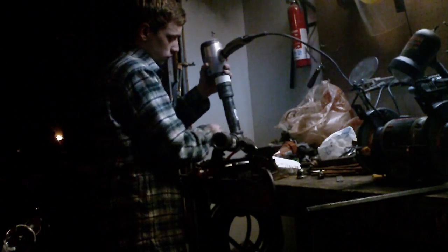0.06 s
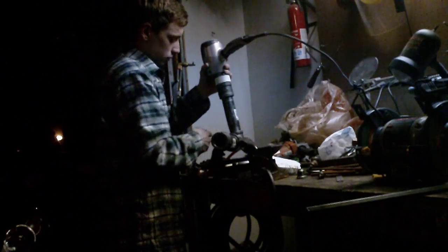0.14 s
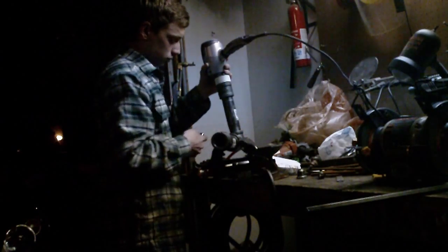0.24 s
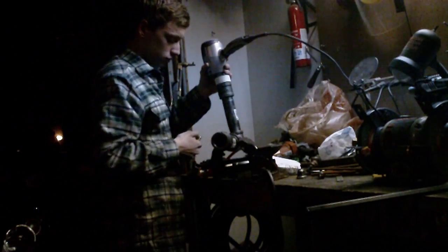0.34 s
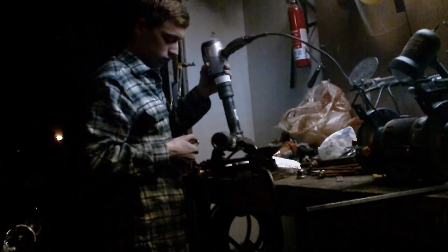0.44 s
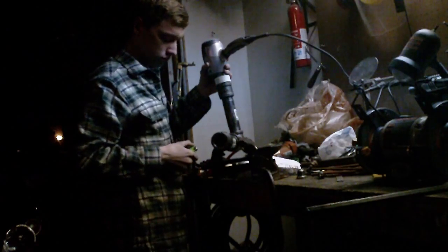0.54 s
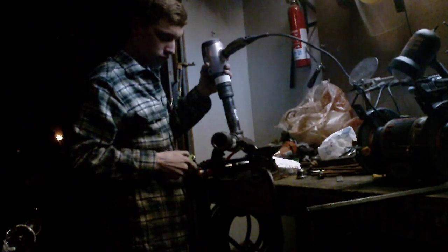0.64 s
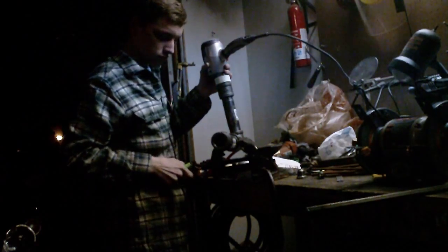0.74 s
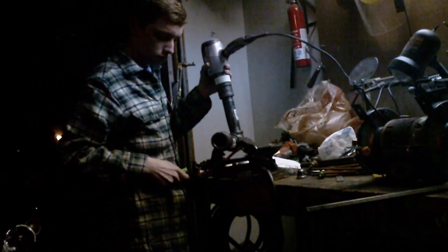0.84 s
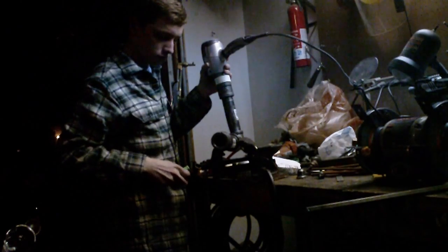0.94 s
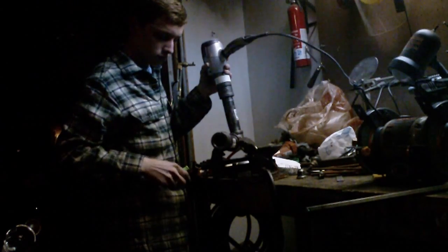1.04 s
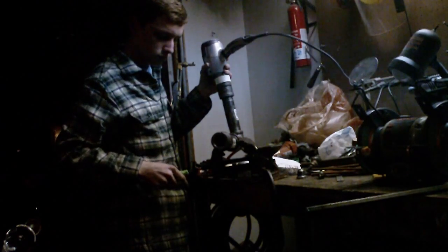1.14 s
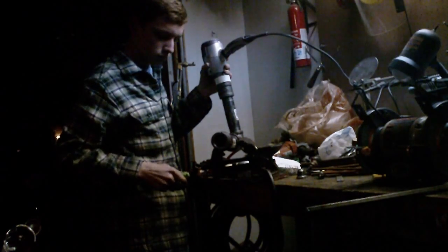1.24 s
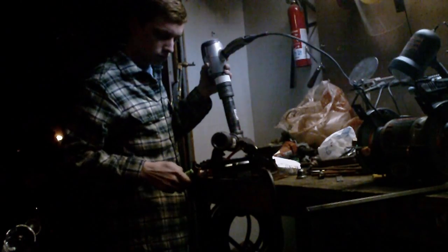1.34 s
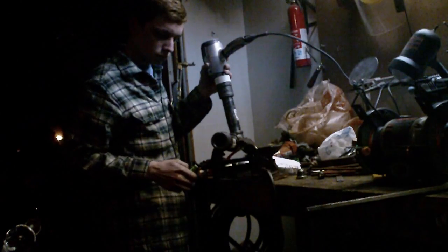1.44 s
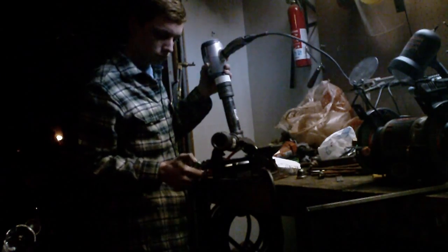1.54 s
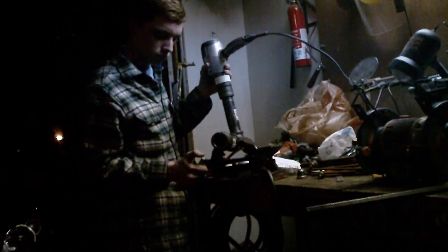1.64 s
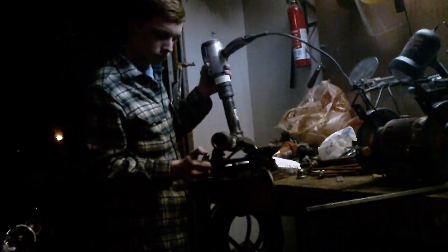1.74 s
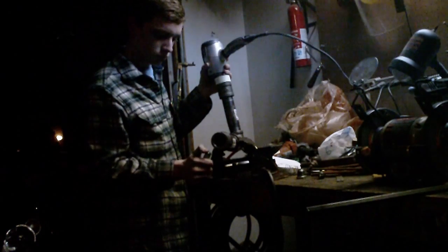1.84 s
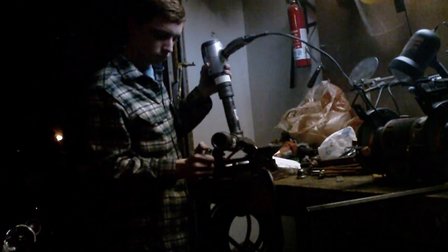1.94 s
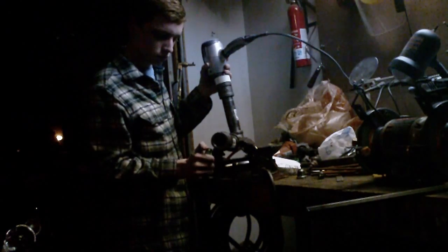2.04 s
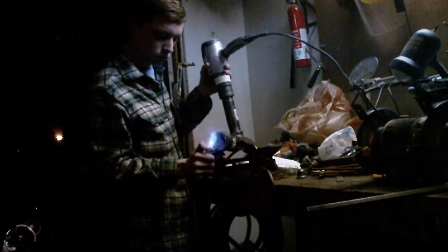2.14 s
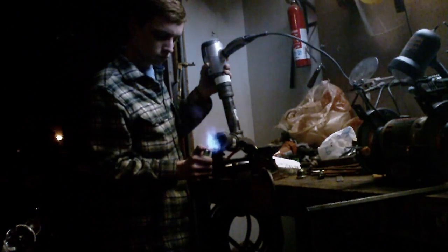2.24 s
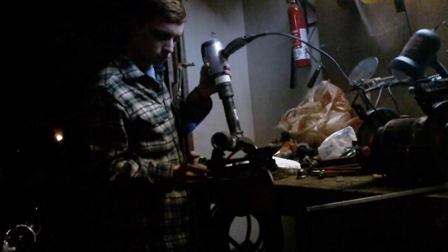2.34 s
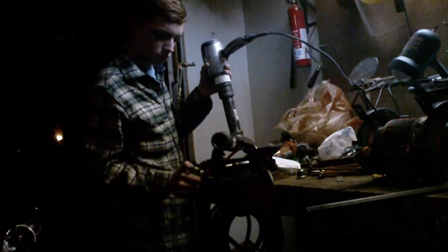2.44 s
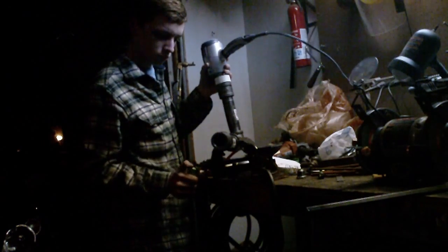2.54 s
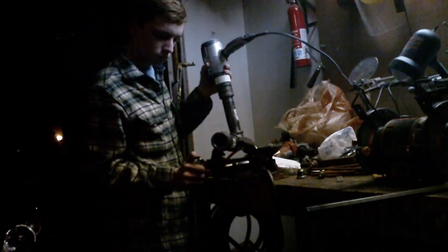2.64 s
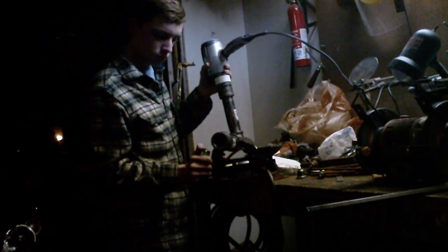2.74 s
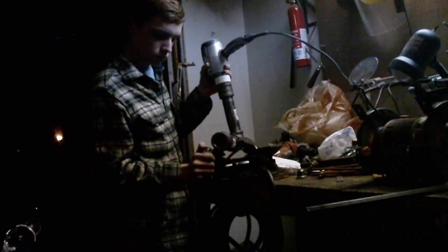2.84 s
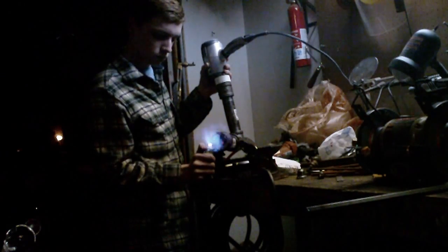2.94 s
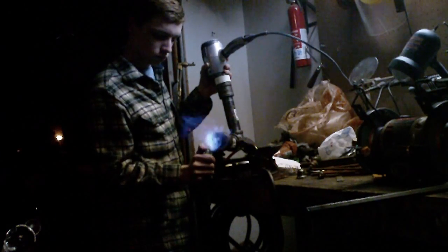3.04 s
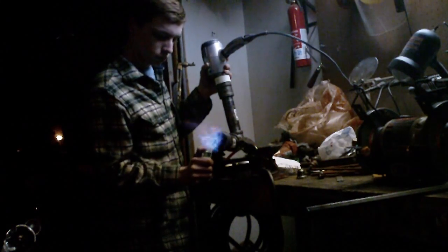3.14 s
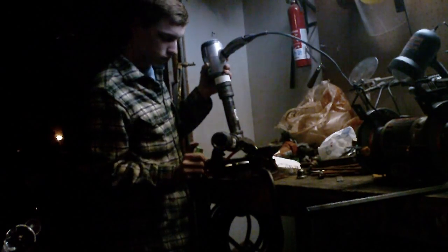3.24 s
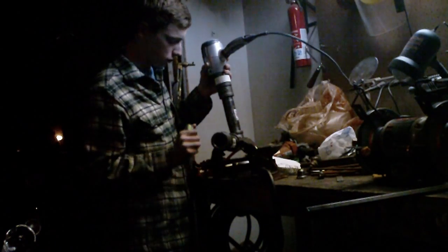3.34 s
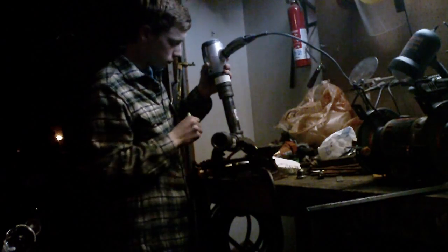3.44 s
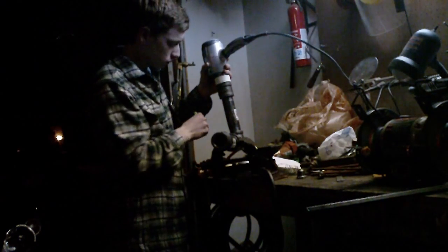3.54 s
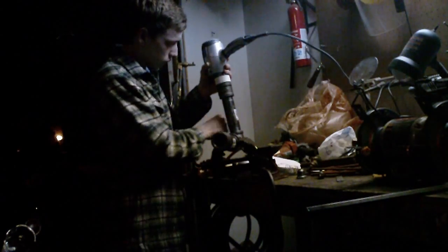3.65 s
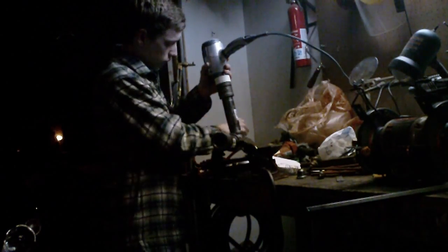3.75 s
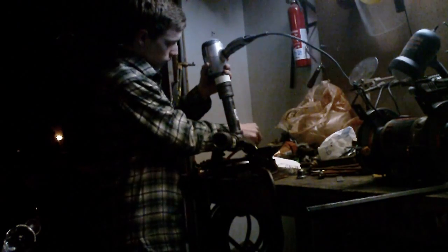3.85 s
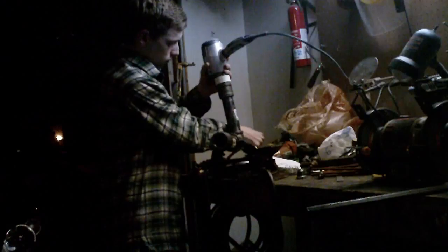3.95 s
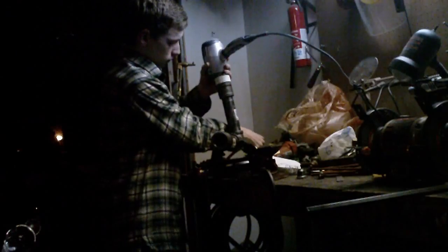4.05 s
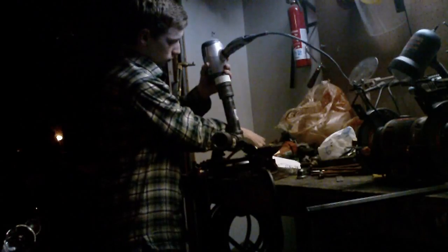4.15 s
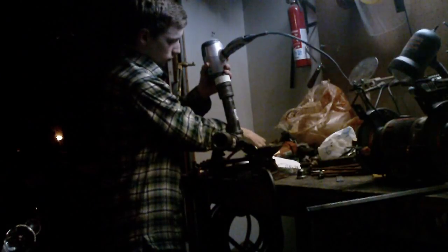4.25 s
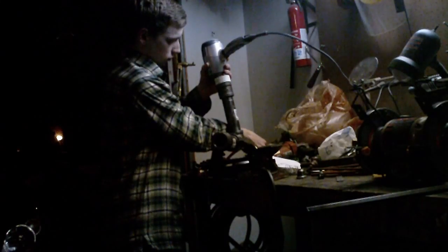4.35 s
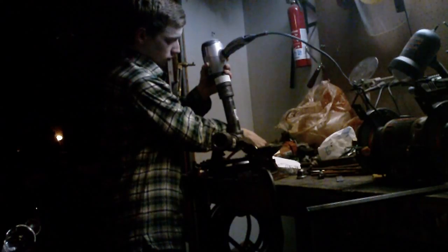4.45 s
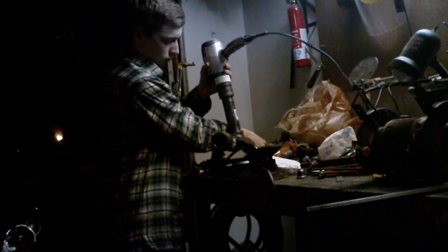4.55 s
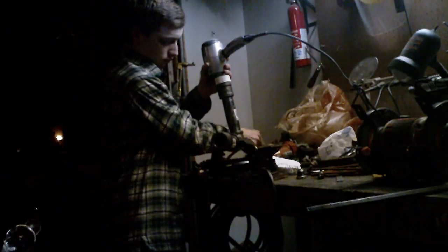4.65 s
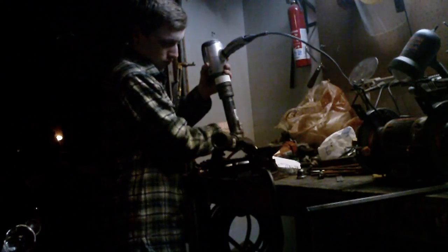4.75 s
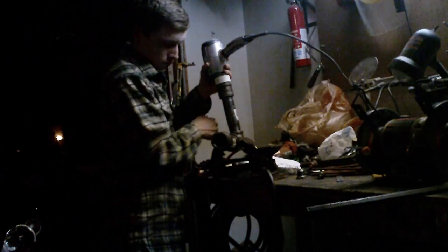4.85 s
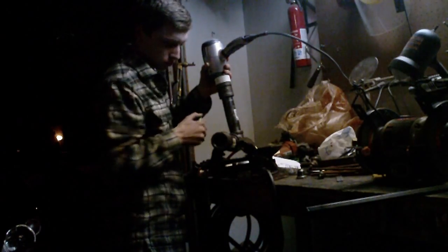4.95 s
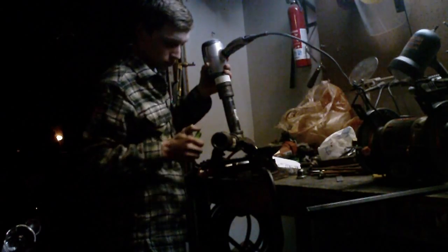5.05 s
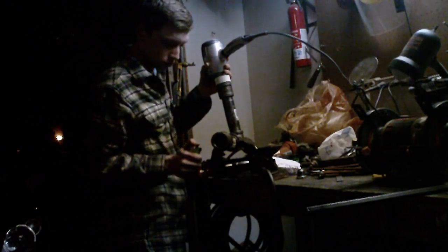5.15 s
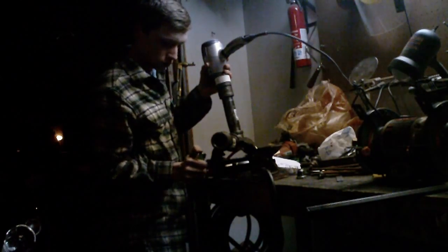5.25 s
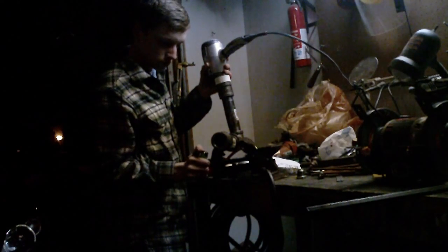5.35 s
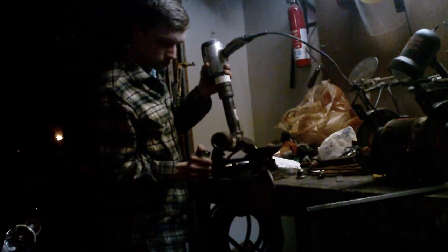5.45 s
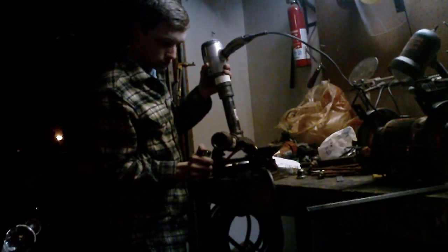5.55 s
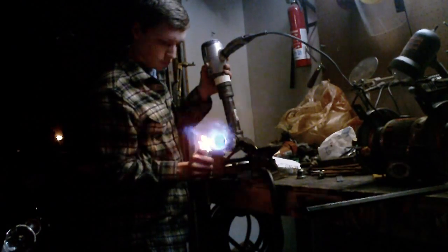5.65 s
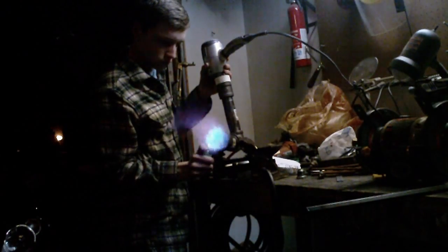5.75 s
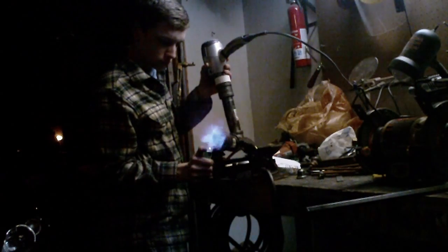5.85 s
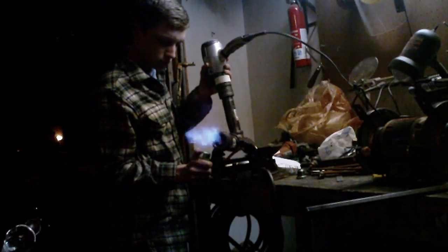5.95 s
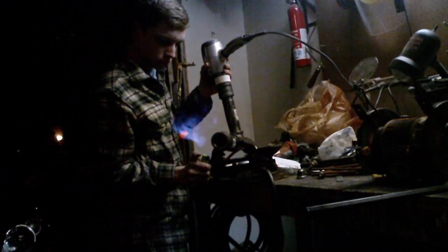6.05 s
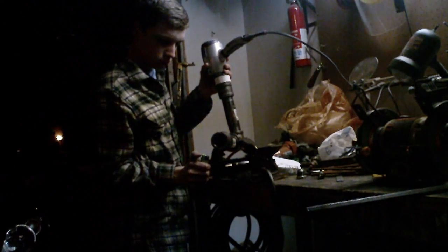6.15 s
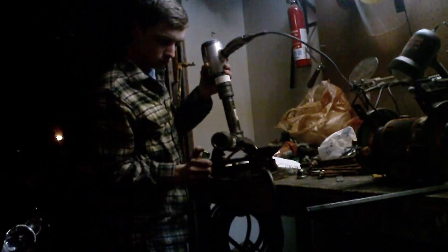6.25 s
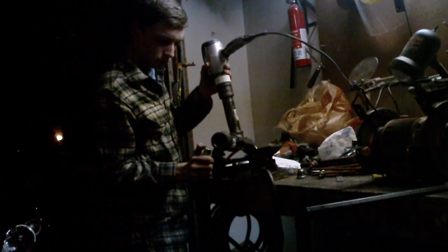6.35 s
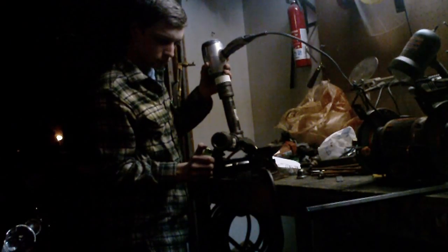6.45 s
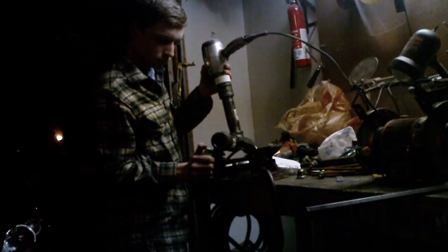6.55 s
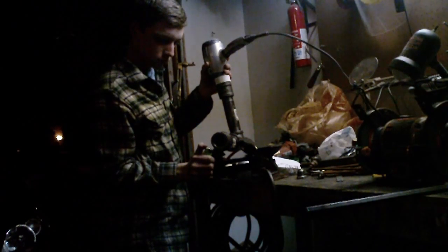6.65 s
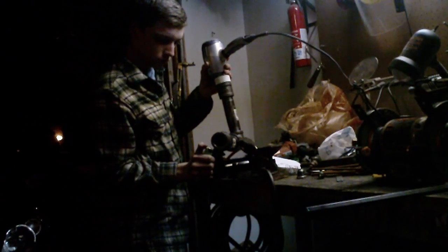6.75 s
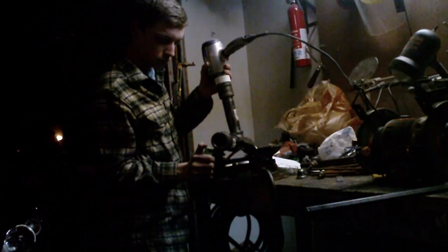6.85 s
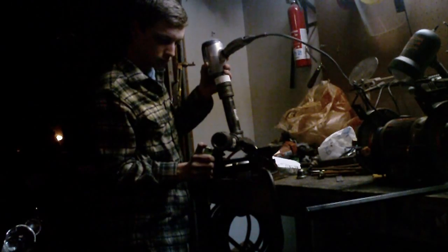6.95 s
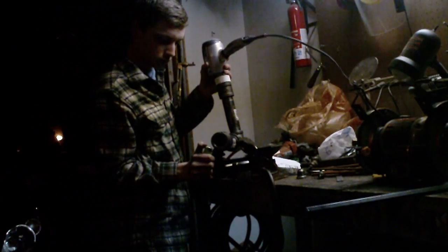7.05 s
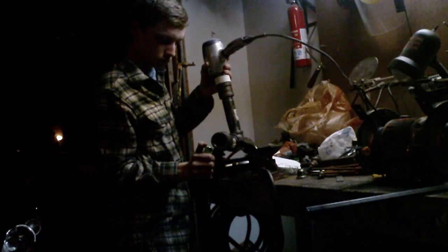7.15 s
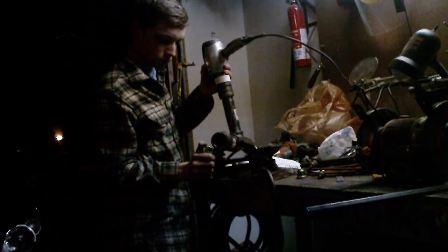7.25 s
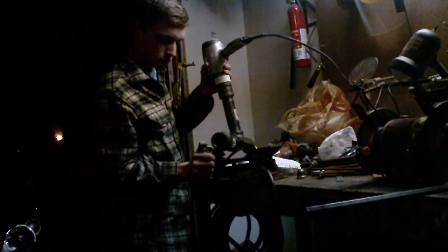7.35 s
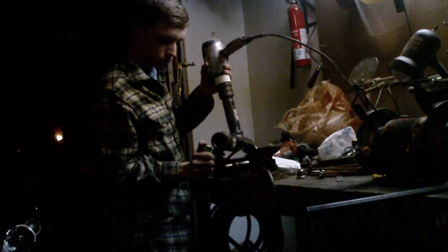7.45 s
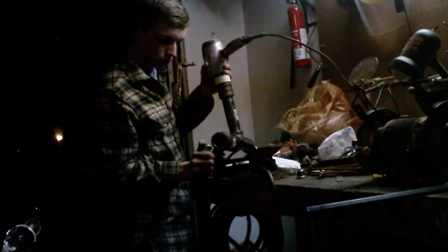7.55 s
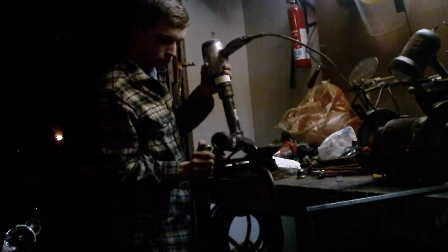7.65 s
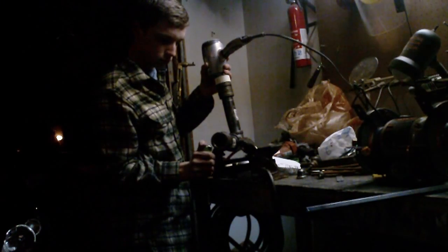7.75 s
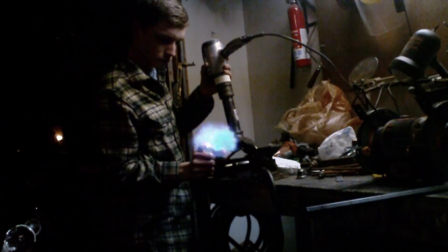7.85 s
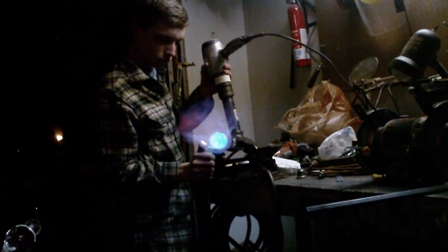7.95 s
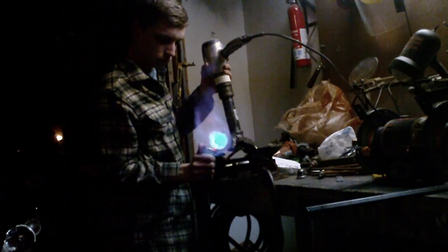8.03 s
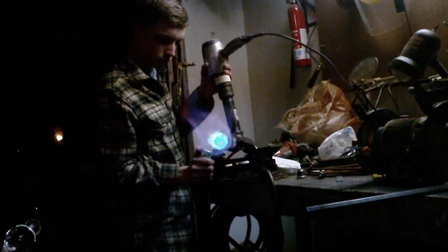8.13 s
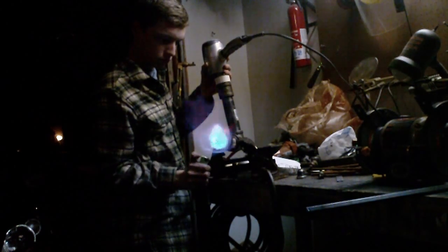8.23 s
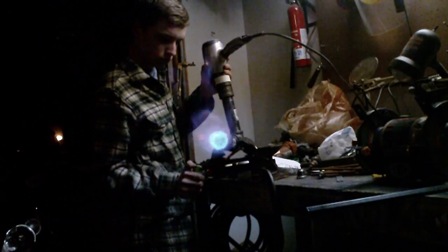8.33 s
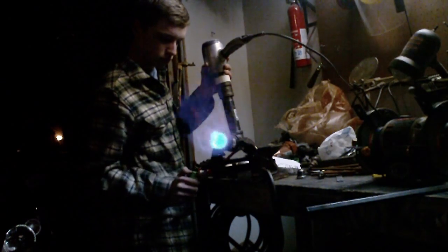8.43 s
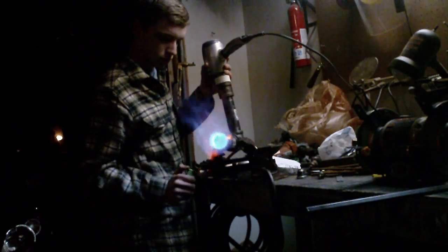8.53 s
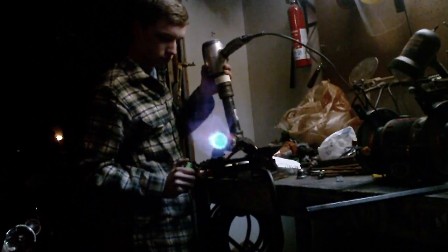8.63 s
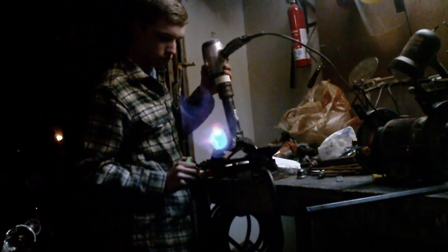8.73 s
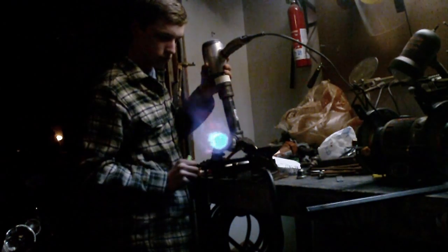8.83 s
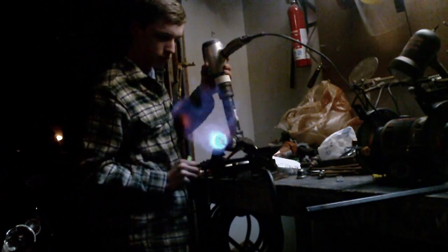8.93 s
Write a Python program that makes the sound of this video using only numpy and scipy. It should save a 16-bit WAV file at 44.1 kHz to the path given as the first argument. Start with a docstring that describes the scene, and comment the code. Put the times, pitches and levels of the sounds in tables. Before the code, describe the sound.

Over a steady blower and gas hiss, three igniter clicks bring short puffs of flame before a fourth lights a lasting roar.

```python
"""Lighting a blown propane burner.

In a garage, a hair dryer blows steadily down a steel pipe into a burner, where the unlit mixture hisses.
An igniter snaps four times: three times the gas catches and blows out, the fourth time it holds and roars.
The hiss softens while the flame burns, and every snap ducks the camera's gain control."""
import sys
import numpy as np
from scipy import signal
from scipy.fft import rfft, irfft, next_fast_len
from scipy.io import wavfile
from scipy.ndimage import uniform_filter1d, map_coordinates

SR = 44100
rng = np.random.default_rng(int(sys.argv[2]) if len(sys.argv) > 2 else 0)


def bounce(signal):
    """Save signal as a 16-bit WAV file at the path given by the first command-line argument."""
    frames = np.transpose(np.atleast_2d(signal))
    limited = np.clip(frames, -1, 1)
    pcm = np.round(limited * 32767).astype(np.int16)
    wavfile.write(sys.argv[1], SR, pcm)


N = 396459


def amp(db):
    """Decibels to gain."""
    return 10 ** (np.asarray(db) / 20)


def unit(x):
    """x at rms 1."""
    return x / np.sqrt(np.mean(x ** 2) + 1e-20)


def ramp(x):
    """0 before x = 0, 1 after x = 1, straight between."""
    return np.clip(x, 0, 1)


def along(points, hz):
    """(frequency, value) points read on a log axis."""
    freqs, values = np.transpose(points)
    return np.interp(np.log(hz + 1), np.log(freqs + 1), values)


def wobble(rate):
    """A smooth random curve, rate knots a second."""
    knots = rng.standard_normal(int(N * rate / SR) + 4)
    return map_coordinates(knots, [np.arange(N) * rate / SR])


def filtered(x, response):
    """x through an EQ curve, given as gain against frequency."""
    size = next_fast_len(len(x) + SR // 4)
    return irfft(rfft(x, size) * response(np.fft.rfftfreq(size, 1 / SR)), size)[:len(x)]


def add(track, start_s, sound):
    """Mixes a sound into the track at a time."""
    part = track[round(start_s * SR):][:len(sound)]
    part += sound[:len(part)]


def turbulence(spectrum, modes):
    """Broad flow noise plus the resonances that it keeps ringing."""
    def gain(hz):
        power = amp(along(spectrum, hz)) ** 2
        for centre, width, db in modes:
            power += (amp(db) / (1 + 1.66 * ((hz - centre) / width) ** 2)) ** 2
        return np.sqrt(power * SR / 2)
    return filtered(rng.standard_normal(N), gain)


# The garage's short reverb: (frequency [Hz], decay T60 [s])
GARAGE_DECAY = [(200, 0.15), (2500, 0.31), (12000, 0.076)]


def garage(x, wet_db):
    """Direct sound plus the wash off the walls, at unchanged power."""
    hz, t, noise = signal.stft(rng.standard_normal(SR // 2), SR, nperseg=256)
    decay = amp(-60 * t / along(GARAGE_DECAY, hz)[:, None])
    tail = signal.istft(noise * decay, SR, nperseg=256)[1]
    reverb = signal.fftconvolve(x, tail / np.linalg.norm(tail))[:len(x)]
    return (x + amp(wet_db) * reverb) / np.hypot(1, amp(wet_db))


# The dryer's bed of rushing air: (frequency [Hz], level [dB per Hz])
AIR_RUSH = [(25.0, -93.3), (60.0, -80.5), (130.0, -78), (240.0, -71.5), (430.0, -67.5), (470.0, -55.5),
            (900.0, -63), (1150.0, -60.5), (1400.0, -62.5), (1700.0, -59.5), (3000.0, -63.5), (6000.0, -67),
            (9000.0, -74.5), (15000.0, -83)]
# Hollow ring of the dryer's barrel and the pipe: (frequency [Hz], width [Hz], level [dB per Hz])
PIPE_MODES = [(255.3, 9.1, -60.5), (279, 13, -62), (398, 32, -68), (468, 4.8, -57), (531, 24.4, -48),
              (572, 23, -60), (673.5, 36, -50.5), (719.4, 16.7, -45.5), (786.3, 7.3, -40.5),
              (825.6, 23.6, -47.5), (882, 20, -52), (926, 36, -53.5), (1037, 26, -55.5), (1520, 9.3, -53),
              (2120, 14, -53), (2360, 175, -59), (2736, 186, -60), (4803, 38, -48.5)]
# Whine of motor and fan: (frequency [Hz], level [dB rms])
MOTOR_TONES = [(781, -34), (1253, -37.5)]


def dryer(drift=0.00099, waver_db=1.6):
    """The fan's air rings the pipe; motor and blades add a slightly unsteady whine."""
    air = amp(0.26 * wobble(3.13)) * turbulence(AIR_RUSH, PIPE_MODES)
    motor_time = np.cumsum(1 + drift * wobble(4)) / SR
    whine = sum(amp(db + waver_db * wobble(9)) * unit(np.sin(2 * np.pi * hz * motor_time))
                for hz, db in MOTOR_TONES)
    return air + whine


# Hiss of the jet at the burner's mouth: (frequency [Hz], level [dB per Hz])
JET_HISS = [(1500, -100), (3000, -83), (4500, -64), (6500, -60), (7500, -68), (9300, -72.5), (11000, -89),
            (13000, -72), (15000, -72)]
# Whistling resonances of the burner tube: (frequency [Hz], width [Hz], level [dB per Hz])
BURNER_MODES = [(3454, 420, -60), (3956, 83, -55.5), (4284, 24, -53), (4780, 49, -50.5), (5230, 21, -52),
                (5280, 37, -48.5), (5680, 61, -54.5), (5880, 39, -51.5), (6010, 41, -49.5), (6098, 28, -49),
                (6300, 57, -60), (6640, 60, -54.5), (6860, 77, -57.5), (7276, 220, -52.5),
                (7680, 87, -57.5), (7903, 125, -49.5), (8310, 64, -52), (8800, 160, -62), (9752, 145, -65),
                (10270, 120, -65.5), (10716, 98, -67.5), (12140, 910, -63), (12500, 35, -54.5),
                (12809, 102, -60), (13266, 289, -57.5), (13721, 203, -59), (14241, 92, -63),
                (15153, 96, -60.5)]
# The hiss darkens as the valve is turned: (time [s], lean from 8 kHz towards 5 kHz [relative])
VALVE_LEAN = [(.8, 1), (2.1, -0.3), (4.25, -1), (4.65, 2.5), (5.7, 2.5), (6.4, 0.5)]


def jet(flutter_db=0.42, fade_db_per_s=.1, brighten_db_per_s=0.25, top_surge_db=5.5):
    """The mixture hisses out, slowly growing thinner and brighter; a flame softens the top band most."""
    hiss = garage(turbulence(JET_HISS, BURNER_MODES), wet_db=-10.5)
    # three bands, near 5, 8 and 13 kHz
    low = filtered(hiss, lambda hz: along([(6500, 0.98), (7400, 0.044)], hz))
    top = filtered(hiss, lambda hz: along([(8500, 0.04), (12000, 1)], hz))
    mid = hiss - low - top
    t = np.arange(N) / SR
    lean = np.interp(t, *np.transpose(VALVE_LEAN))
    grip, surge = flame_on_jet()
    surge_db = top_surge_db * surge
    low *= amp(0.68 - fade_db_per_s * t + 0.63 * lean + 0.95 * surge_db - 4.5 * grip)
    mid *= amp(0.4 - fade_db_per_s * t - 0.77 * lean + 1.9 * surge_db - 8.5 * grip)
    top *= amp(-1.3 + brighten_db_per_s * t + surge_db - 10.3 * grip)
    return amp(flutter_db * wobble(12)) * (low + mid + top)


# Bright, tight ring of the igniter's body: (frequency [Hz], relative level [dB], decay T60 [s])
IGNITER_MODES = [(2130, -9, 0.01), (2560, -6, 0.0076), (3800, -13, 0.0049), (4470, -6, 0.0096),
                 (4920, -1.5, 0.0081), (5500, -2, 0.0069), (7900, -3.5, 0.0039), (13200, -12, .005)]


def hammer_blow(t, crack_db=-8, crack_t60=0.0055):
    """One blow of the igniter's hammer: the body's modes under a brief crack."""
    ring = sum(amp(db + rng.normal(0, 1) - 60 * t / t60) * np.sin(2 * np.pi * (hz * t + rng.random()))
               for hz, db, t60 in IGNITER_MODES)
    crack = amp(crack_db - 60 * t / crack_t60) * rng.standard_normal(len(t))
    return ring + crack


# Cue list of the four tries, for snap, whump and flame: (time [s], snap level [dB], wait to catch [s],
# whump level [dB], flame gain [dB], first flare over that gain [dB], burn time [s])
TRIES = [(2.1698, -5, 0.038, -26, -4, -5.5, 0.19), (2.9999, -5, 0.043, -28.5, -4.5, 0, 0.21),
         (5.7126, -6, 0.047, -21, -1.7, 8.5, .32), (7.9352, -4.5, .035, -4.5, 0, 4, 1.2)]


def igniter(rebound_s=.0034, rebound_db=-2, low_cut_hz=1300):
    """The spring hammer strikes and rebounds: a hard double snap in the room."""
    track, t = np.zeros(N), np.arange(SR // 3) / SR
    for start, db, *_ in TRIES:
        snap = hammer_blow(t)
        add(snap, rebound_s, amp(rebound_db) * hammer_blow(t))
        # so small a body radiates no bass
        snap = filtered(snap, lambda hz: (hz / low_cut_hz) ** 2 / np.hypot(1, (hz / low_cut_hz) ** 2))
        snap = garage(snap, wet_db=-0.5)
        attack_rms = np.std(snap[:SR // 160])
        add(track, start, amp(db) * snap / attack_rms)
    return track


def whumps(pitch_hz=245, swell_s=0.0043):
    """The gathered gas catches a moment after the spark, with a few low pressure swings."""
    track, t = np.zeros(N), np.arange(SR // 8) / SR
    push = (t / swell_s) ** 2 * np.exp(2 * (1 - t / swell_s))
    for start, _, wait, db, *_ in TRIES:
        add(track, start + wait, amp(db) * push * np.sin(2 * np.pi * pitch_hz * t))
    return track


def flame_on_jet(lead_s=.025, grip_s=.035, size_power=1.76, return_lag_s=0.13, return_s=0.096,
                 surge_s=.5, brief_below_s=0.32):
    """How firmly a flame grips the jet (a bigger one more so), and the hiss's surge after a brief one."""
    t, grip, surge = np.arange(N) / SR, np.zeros(N), np.zeros(N)
    for start, _, wait, _, flame_db, _, burn_s in TRIES:
        age = t - start - wait
        since_out = age - burn_s - return_lag_s
        caught = ramp((age + lead_s) / grip_s)
        gone = ramp(since_out / return_s + .5)
        grip += amp(size_power * flame_db) * caught * (1 - gone)
        brevity = ramp(1 - burn_s / brief_below_s)
        overshoot = brevity * gone * np.exp(-np.maximum(since_out, 0) / surge_s)
        surge = surge * (1 - caught) + overshoot
    return grip, surge


def flame_envelope(spread_db_per_s=1200, flare_s=0.033, blowout_db_per_s=132):
    """Flame gain in dB: it spreads, flares and holds; once its burn time is up the air blows it out."""
    t, envelope_db = np.arange(N) / SR, np.full(N, -80.0)
    for start, _, wait, _, flame_db, flare_db, burn_s in TRIES:
        age = t - start - wait
        spreading = spread_db_per_s * np.minimum(age, 0)
        flare = flare_db * np.exp(-np.maximum(age, 0) / flare_s)
        failing = blowout_db_per_s * np.maximum(age - burn_s, 0)
        envelope_db = np.maximum(envelope_db, flame_db + spreading + flare - failing)
    return envelope_db


# Broad roar of turbulent combustion: (frequency [Hz], level [dB per Hz])
COMBUSTION = [(25, -68), (60, -56.5), (150, -55.5), (400, -57), (800, -61), (1000, -54), (1300, -55),
              (1700, -66.5), (2500, -68), (6000, -88)]
# Boom of burner and garage under the roar: (frequency [Hz], width [Hz], level [dB per Hz])
ROAR_MODES = [(104, 19, -53), (175, 21.4, -39.5), (213, 14, -41), (247.7, 19.6, -37), (305.4, 23, -38),
              (352, 20, -44), (477, 25, -43), (552, 100, -48.5), (752, 33, -45)]


def flame(flicker_db=1.0, rasp_db=-1.5, rasp_growth=0.22, seated_at_s=8.3, seating_s=0.14):
    """A flickering roar: a bigger flame rasps more; seated in the burner, it trades rumble for rasp."""
    burn_db = flame_envelope()
    roar = turbulence(COMBUSTION, ROAR_MODES)
    rumble = filtered(roar, lambda hz: along([(90, 1), (150, 0)], hz))
    rasp = filtered(roar, lambda hz: along([(360, 0.044), (460, 0.47)], hz))
    body = roar - rumble - rasp
    seated = (1 + np.tanh((np.arange(N) / SR - seated_at_s) / seating_s)) / 2
    rumble *= amp(-5 * seated)
    rasp *= amp(rasp_db + rasp_growth * burn_db + 4.5 * seated)
    return amp(burn_db + flicker_db * wobble(45)) * (rumble + body + rasp)


def scene():
    """Everything at the workbench, mixed to mono."""
    return (dryer() + jet() + flame() + igniter() + whumps())[None]


def gain_control(x, threshold_db=-11, slope=0.85, release_db_per_s=6, attack_s=0.0087):
    """Sharp treble peaks duck the whole mix quickly, and the gain creeps back."""
    treble = filtered(x, lambda hz: hz > 1500)
    level_db = 10 * np.log10(np.abs(uniform_filter1d(treble ** 2, size=SR // 160)) + 1e-12)
    wanted_cut_db = slope * np.maximum(level_db - threshold_db, 0)
    creep_db = release_db_per_s * np.arange(N) / SR
    held_cut_db = np.maximum.accumulate(wanted_cut_db + creep_db) - creep_db
    step = 1 - np.exp(-2 / (attack_s * SR))
    return x * amp(-signal.lfilter([step], [1, step - 1], held_cut_db))


def record(dry, notch_hz=11230, notch_width_hz=550, high_cut_hz=15330):
    """The camera's signal chain: a narrow treble notch, gain control, clipping and a high cut."""
    x = filtered(dry[0], lambda hz: np.abs(hz - notch_hz) / np.hypot(hz - notch_hz, notch_width_hz))
    x = np.clip(gain_control(x), -1, 1)
    return filtered(x, lambda hz: hz < high_cut_hz)[None]


dry = scene()
out = record(dry)
bounce(out)
```